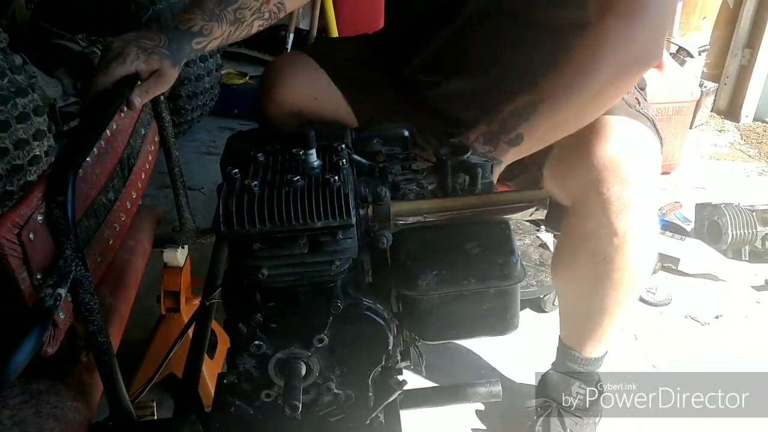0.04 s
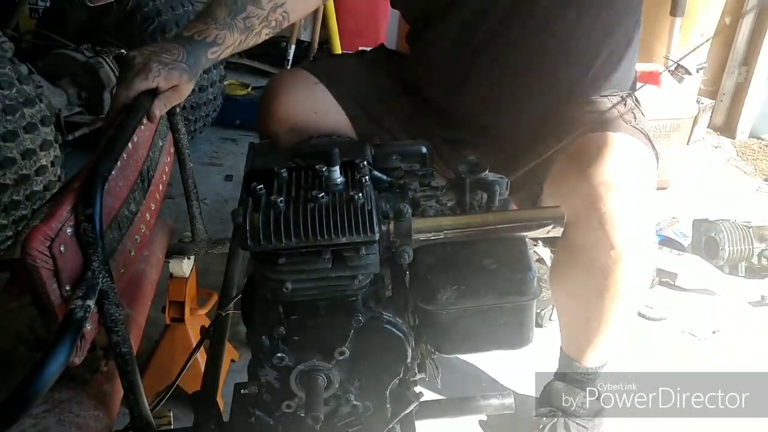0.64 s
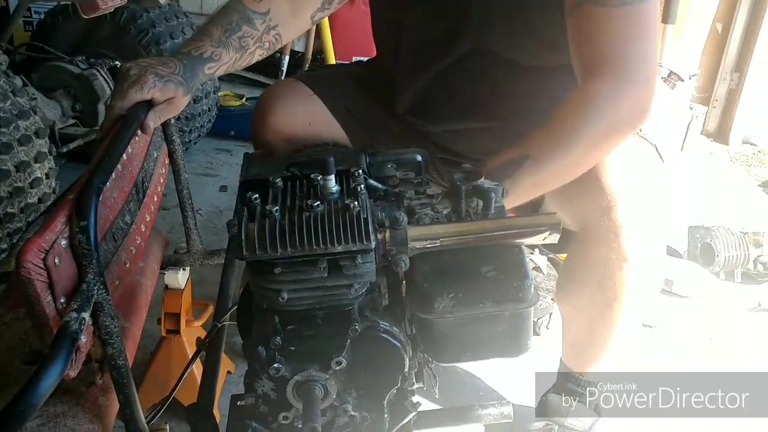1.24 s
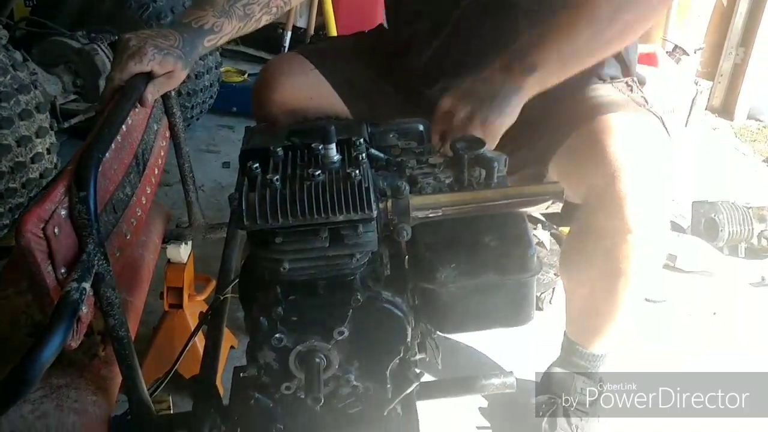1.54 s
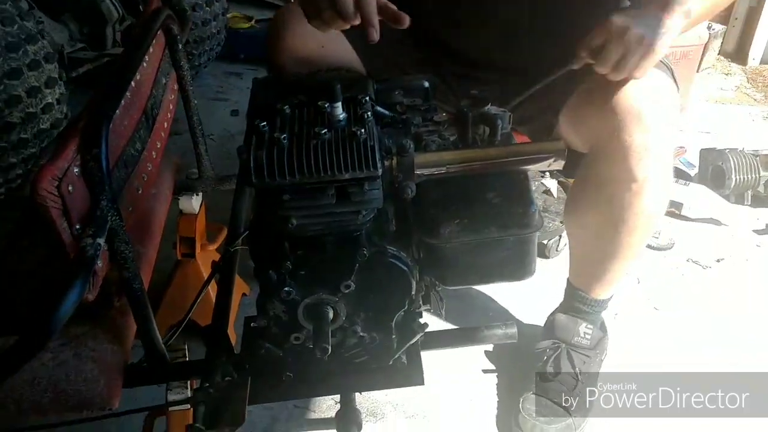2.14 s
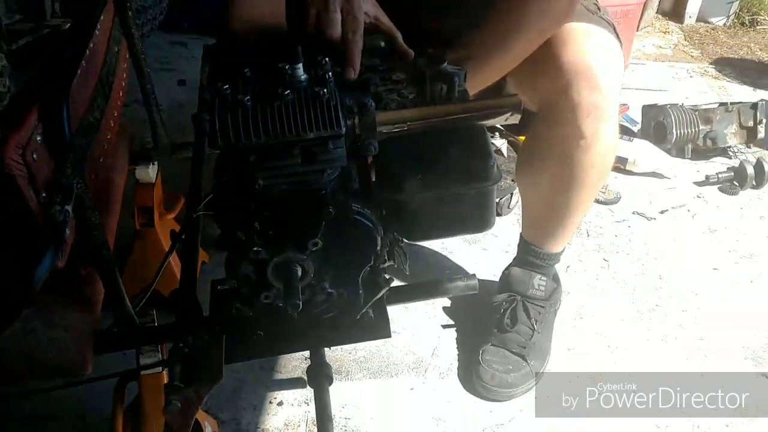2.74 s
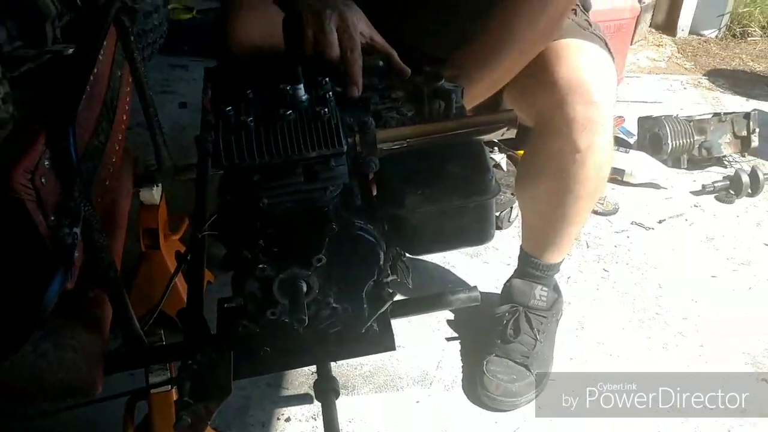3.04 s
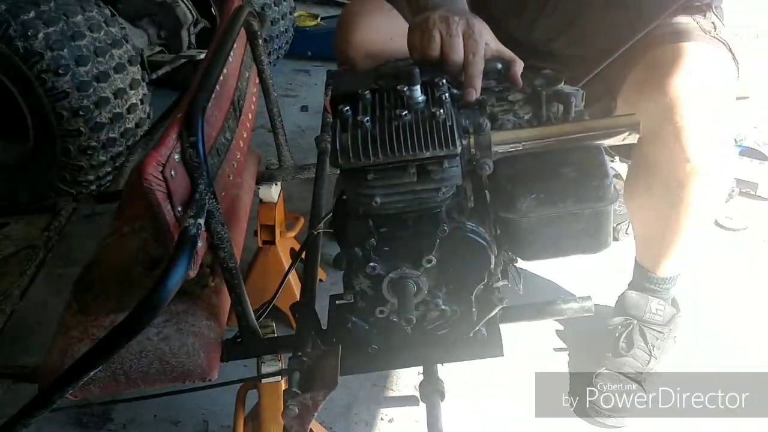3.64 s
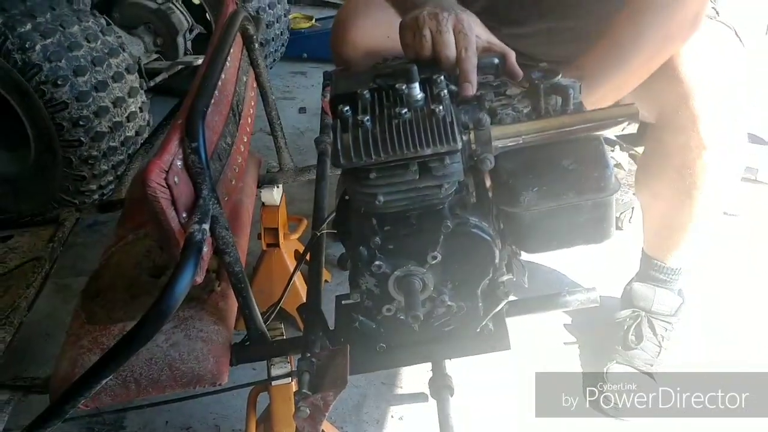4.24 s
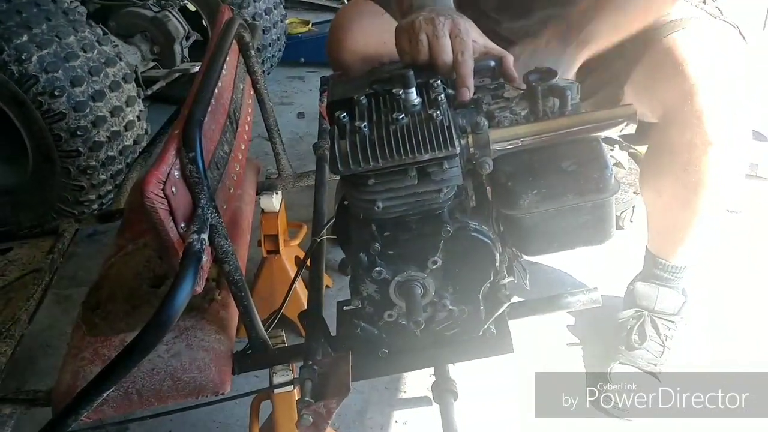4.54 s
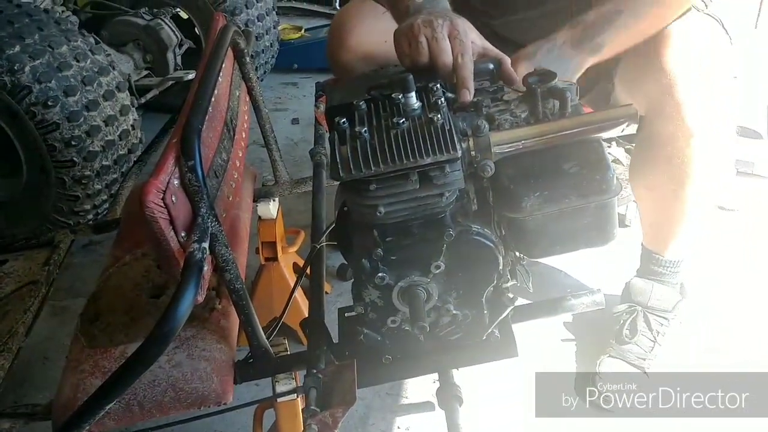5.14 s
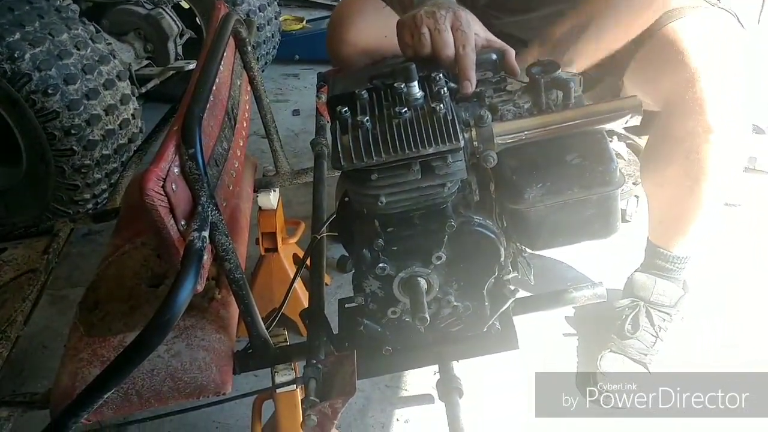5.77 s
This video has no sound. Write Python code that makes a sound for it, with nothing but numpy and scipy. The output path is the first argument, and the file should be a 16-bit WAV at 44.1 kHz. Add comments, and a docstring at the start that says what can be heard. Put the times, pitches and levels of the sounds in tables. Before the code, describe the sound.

A small petrol engine is pull-started four times without catching, with rope hiss, metal clacks, rattling and dull thumps.

```python
"""A rope hisses and loose metal knocks: someone is about to pull-start a small petrol engine in a workshop.
They pull four times, but it does not catch. On each pull the starter's catches (pawls) snap in, the
turning parts rattle, the piston thumps and air chuffs out; then the rope winds back and the handle
knocks home. Between pulls, fingers squeak and tap on the carburettor. Near the end, three tiny, high
pings fall in pitch over a soft background hiss and hum."""
import sys
import numpy as np
from scipy import signal
from scipy.fft import rfft, irfft, next_fast_len
from scipy.io import wavfile
from scipy.ndimage import uniform_filter1d

SR = 44100
rng = np.random.default_rng(int(sys.argv[2]) if len(sys.argv) > 2 else 0)


def unload_audio(sound):
    """Save the sound as a 16-bit wav file, at the path given as the first command line argument."""
    columns = np.transpose(np.atleast_2d(sound))
    # keep every value between -1 and 1, then stretch to whole-number steps
    steps = np.round(np.clip(columns, -1, 1) * 32767)
    wavfile.write(sys.argv[1], SR, steps.astype(np.int16))


N = 260526
TIME = np.arange(N) / SR
FFT_SIZE = next_fast_len(N + SR // 2)
HZ = np.maximum(np.arange(FFT_SIZE // 2 + 1) * SR / FFT_SIZE, 1)

# Levels are relative. A "colour" says how strong a sound is from low to high pitch.
# slides of the rope: loudest at t/s, level/dB, swell/(dB per s), fade/s, thinness/0-1
ROPE_SLIDES = [(0.085, -23, 74, 0.099, 0.12), (0.915, -36.5, 150, 0.015, 0.5),
               (1.677, -31.5, 322, 0.2, 0.6), (4.635, -22, 75.5, 0.12, 0.7)]
ROPE_COLOURS = [
    [(150, -13), (400, -5.5), (620, 0.5), (1200, -8), (2100, -22), (2800, -10.5), (4200, -13), (5400, -5),
     (6100, -15.5), (7400, 1), (8700, -14), (9600, -7.5), (12500, -12.5), (15300, -3)],
    [(150, -15.5), (400, -7), (700, 4.5), (1200, -12), (2100, -5.5), (3200, -0.5), (4200, -9), (5400, -3.5),
     (7400, 5), (8400, -22), (9500, 1), (12000, -2.5), (13400, 6.5), (15300, 1)],
]   # one full hiss and one thin hiss: f/Hz, level/dB
HISS_COLOUR = [(22, -25), (50, -12), (75, -3), (140, 5), (230, -6), (550, -7.5), (1100, -16), (1700, -20),
               (2150, -17.5), (2700, -20), (3300, -12.5), (4300, -10), (5300, -6), (9000, -18.5),
               (15300, -27.5)]   # background hiss: f/Hz, level/dB
ROOM_HUM = [(120, -88.5), (160, -56)]   # low tones of the room: f/Hz, level/dB
# knocks of the starter, handle and frame: t/s, level/dB, treble/dB, decay/s
METAL_KNOCKS = [(0.018, -29.5, -6, 0.0075), (0.041, -26.5, -16, 0.018), (0.082, -20.5, -2, 0.0045),
                (0.126, -26, -16, 0.0065), (0.4333, -29, 0.5, 0.0076), (0.496, -24.5, -0.5, 0.0081),
                (0.564, -19, -20, 0.033), (0.721, -19, -11.5, 0.024), (0.756, -18.5, -18, 0.0091),
                (0.872, -32.5, -10, 0.044), (0.905, -36.5, -13, 0.073), (1.091, -27, -15.5, 0.019),
                (1.179, -20, -28, 0.021), (1.423, -31, -21, 0.0095), (1.679, -25, -5, 0.023),
                (1.747, -23.5, -5, 0.017), (1.832, -31.5, -14, 0.0087), (1.889, -33, 1, 0.019),
                (1.915, -18.5, -13, 0.017), (1.957, -19, -9, 0.0068), (1.975, -25, -14, 0.027),
                (2.08, -41.5, -24, 0.0039), (2.102, -29, -25, 0.017), (2.122, -33.5, -18, 0.011),
                (2.158, -33, -13, 0.019), (2.21, -35, -16, 0.03), (2.482, -33, -18, 0.0041),
                (3.306, -44, -31, 0.028), (3.389, -43, -9.5, 0.055), (3.472, -35.5, -23, 0.036),
                (3.494, -24, -19, 0.014), (3.568, -22.5, -9, 0.015), (3.603, -24, -21, 0.008),
                (3.622, -23.5, -14.5, 0.005), (3.656, -17.5, -24.5, 0.013), (3.728, -25, -13, 0.016),
                (3.824, -31, -13.5, 0.011), (3.971, -36, -9, 0.0091), (3.997, -31, -13.5, 0.018),
                (4.038, -36, -29, 0.064), (4.195, -28.5, -13.5, 0.026), (4.3047, -22.5, -36.5, 0.013),
                (4.373, -35.5, -25.5, 0.016), (4.4614, -21.5, -14, 0.0049), (4.501, -24.5, -18.5, 0.0063),
                (4.581, -28.5, -20.5, 0.0057), (4.673, -11.5, -14.5, 0.012), (4.775, -21.5, -5, 0.015),
                (4.807, -27.5, -16, 0.0099), (4.881, -21.5, -2, 0.015), (5.279, -38, -35, 0.014),
                (5.319, -40, -25, 0.011), (5.869, -49, -16.5, 0.12)]
METAL_TICKS = [(0.436, -13.5), (0.5425, -27), (1.009, -26), (1.14, -26), (1.771, -10.5), (2.015, -26),
               (2.223, -33), (2.282, -25), (2.367, -24.5), (2.4384, -25.5), (2.506, -27), (3.603, -13.5),
               (3.955, -23), (4.02, -23), (4.153, -25), (5.4256, -42.5), (5.466, -45)]   # light ticks: t/s, level/dB
KNOCK_COLOUR = [(100, -18.5), (250, -10.5), (400, -3), (650, -1), (900, 0.5), (1250, -6), (1550, -8),
                (1800, -6.5), (2200, -9), (3100, -12), (4400, -27.5), (8000, -35.5)]   # body of a knock: f/Hz, level/dB
SCRAPE_COLOUR = [(1800, -23), (2700, -6.5), (3500, 4), (4300, 0.5), (5200, 1), (7000, 1.5), (10000, -1),
                 (12000, -4.5), (13000, 0), (14000, -9.5), (15300, -0.5)]   # bright metal contact: f/Hz, level/dB
CASING_RINGS = [(299, 18, 3), (381.2, 6.6, 8.5), (470, 110, 5), (591.4, 18, 10), (709, 7.7, 5.5),
                (849, 64, 6.5), (1022, 33, 6.5), (1100, 28, 9), (1239, 100, 7.5), (1550, 45, 1.5),
                (1708, 54, 7), (2970, 49, 0), (3090, 24, -0.5), (3550, 70, -0.5), (3650, 22, 0.5),
                (4780, 410, 5.5), (5100, 34, 6), (6330, 60, 3), (11100, 45, 3)]   # pitches at which the casing rings: f/Hz, width/Hz, lift/dB
STEEL_RINGS = [(580, -8.5, .7), (843, -9, .8), (1095, -16, .5), (1286, -16, 0.44), (1580, -14.5, .4)]   # thin steel parts: f/Hz, level/dB, time to fall 60 dB/s
# squeaks of pulley, spring and fingertips: t/s, length/s, start f/Hz, end f/Hz, level/dB, waver/share of f
SQUEAK_GLIDES = [(0.343, 0.015, 4330, 4120, -37, .035), (0.391, 0.012, 4530, 4270, -36, .035),
                 (0.612, 0.03, 3230, 2600, -24.5, 0.043), (0.635, 0.069, 5100, 5080, -29.5, 0.062),
                 (1.396, .012, 4480, 4130, -41, .03), (1.441, 0.013, 4560, 4030, -32, 0.027),
                 (1.492, 0.049, 4290, 4590, -34, 0.03), (2.1, 0.055, 2930, 3000, -38.5, 0.024),
                 (2.328, 0.04, 180, 219, -44, .03), (2.55, 0.29, 852, 843, -51, .007),
                 (2.818, 0.04, 540, 310, -41.5, 0.12), (2.854, 0.033, 276, 187, -41, .1),
                 (2.883, 0.031, 850, 830, -40, .02), (2.898, 0.032, 677, 516, -44.5, .1),
                 (2.911, 0.032, 450, 249, -40.5, .12), (2.994, 0.016, 347, 288, -37.5, .03),
                 (3.02, 0.016, 293, 240, -38, .03), (3.023, 0.026, 748, 500, -45, .03)]
# pawls hitting the starter cup: t/s, level/dB, decay/s, clang/dB, sharpness/0-1
PAWL_SNAPS = [(0.4358, -18, 0.009, -16, 0.6), (0.4432, -18.5, 0.016, -9, 0.3),
              (0.456, -22.5, .012, -9.5, 0.4), (0.49, -22, .012, -10, .4), (0.513, -24, 0.011, -5.5, .5),
              (0.733, -19.5, 0.018, -22, 0), (1.677, -18.5, 0.021, -4.5, 0.02),
              (1.696, -21, 0.0065, -8.5, .5), (1.768, -17, 0.0035, -14, 0.1), (3.569, -22.5, 0.036, -6, 0),
              (3.676, -18.5, 0.009, -1.5, 0.6), (4.882, -11, 0.009, -2.5, 1)]
SOLID_COLOUR = [(420, -15.5), (560, -2.5), (700, -12), (900, 4.5), (1250, -4), (1650, -5), (2200, -7)]   # solid clack: f/Hz, level/dB
SHARP_COLOUR = [(600, -10.5), (900, -4), (1300, -2), (1650, -1.5), (2200, -10.5)]   # sharper clack: f/Hz, level/dB
CLANG_COLOUR = [(2200, -22.5), (2800, -2.5), (3400, -1), (4300, -17.5), (6000, -17.5)]   # high clang: f/Hz, level/dB
# pulls: t/s, pull/s, rewind/s, rattle level/dB, scrape level/dB, rattle drop/dB, scrape drop/dB
ROPE_PULLS = [(0.46, 0.21, 0.7, -27.5, -28, 2, 6.5), (1.672, 0.3, 1, -27.5, -30.5, 7.5, 9.5),
              (3.538, 0.29, 0.96, -30, -31.5, 7, 9), (4.694, 0.17, 0.29, -24.5, -27.5, 6, 5)]
# the crank falters as the piston climbs: t/s, dip/dB (a negative dip is a lift)
CRANK_STALLS = [(0.487, 2.5), (0.71, -2), (3.643, 6.5)]
RATTLE_COLOUR = [(50, -31), (110, -7), (240, -3), (380, -2.5), (520, -9), (720, -7), (950, -1.5),
                 (1250, -5.5), (1500, -7.5), (1800, -7), (2200, -9), (3000, -10), (3600, -20.5),
                 (4400, -23.5)]   # dull rattle of the turning parts: f/Hz, level/dB
PISTON_STROKES = [(0.502, -26.5), (0.586, -9.5), (1.777, -14), (1.916, -12), (3.604, -24.5), (3.697, -16.5),
                  (4.777, -12.5), (4.899, -21), (4.957, -23.5), (5.025, -24), (5.132, -26)]   # the piston pushes against trapped air: t/s, level/dB
FRAME_RINGS = [(62, -9.5, 0.026), (120, 4, 0.036), (148.3, -12.5, 0.19)]   # the engine on its frame: f/Hz, level/dB, time to fall 60 dB/s
# air leaving the cylinder: t/s, pop level/dB, rush level/dB, decay/s, lower f/Hz, upper f/Hz
AIR_BURSTS = [(0.586, 12, -13, 0.0027, 360, 804), (0.5919, 17.5, -10.5, 0.0023, 393, 820),
              (1.7712, 11, -7, 0.0038, 390, 830), (3.694, 18, -10, 0.0088, 396, 820),
              (3.7007, 13, -13.5, .005, 420, 850), (4.8946, 18.5, -9.5, 0.004, 318, 470)]
PORT_RINGS = [(55, 12.5), (100, 8)]   # lower and upper ring of the air outlet: width/Hz, lift/dB
CHUFF_COLOUR = [(110, -3.5), (220, -12), (370, -6), (600, -9), (850, -4.5), (1150, -4.5), (1600, -12),
                (2200, -10), (3300, -13.5), (4500, -21), (9000, -24.5), (15000, -25.5)]   # escaping air: f/Hz, level/dB
HAND_CHANGES = [(304, 37, 1.5), (430, 52, 3), (595, 30, -2.5), (617, 40, 2.5), (850, 56, -0.5),
                (925, 40, -5.5), (1097, 49, -4.5), (1380, 100, 0.5), (1543, 63, -0.5), (1700, 110, -3.5)]   # how a resting hand changes the ringing: f/Hz, width/Hz, change/dB
SCUFF_COLOUR = [(3000, 0), (4300, -8), (5500, 2), (7200, -4), (8300, -6), (9600, 1.5), (11000, -15),
                (13300, -6), (15300, -11)]   # a hand brushing the starter housing: f/Hz, level/dB
FINGER_COLOUR = [(150, 1.5), (380, -11.5), (600, -5.5), (900, -0.5), (1300, -5), (2000, -8), (3300, -2.5),
                 (4400, -19)]   # fingers on metal: f/Hz, level/dB
FINGER_TAPS = [(2.861, -45), (2.9948, -43), (3.025, -40.5)]   # taps on the carburettor: t/s, level/dB
HIGH_PINGS = [(5.634, 12500, -40), (5.640, 9600, -36), (5.649, 6970, -40.5)]   # tiny pings near the end: t/s, f/Hz, level/dB
EAR_LIKENESS = [(60, 0.4), (130, 0), (250, 0.7), (500, 0.83), (1100, 1), (1700, 0.66), (2150, 0.95),
                (2700, 0.22), (3300, 0.75), (4300, 0.62), (5400, 0.32), (8000, 0.2), (14000, 0)]   # how alike left and right are: f/Hz, likeness/0-1
LEFT_LOUDER = [(60, 1), (150, 1.5), (400, 2.5), (800, 2), (1200, -1.5), (3000, 0), (8000, 0), (14000, -2.5)]   # how much louder the left side is: f/Hz, level/dB
LEFT_AHEAD = [(0, 0), (300, -.4), (800, -.25), (1300, .1), (2150, 3.1), (3250, 6.2), (4300, 8.8),
              (6500, 14.8), (9900, 23.3), (13200, 32.1), (16000, 40.8)]   # how far the left side is ahead: f/Hz, phase/rad


def from_db(db):
    """Turn decibels into a number to multiply by."""
    return np.exp(np.asarray(db) * (np.log(10) / 20))


def rms_one(x):
    """Scale to an average power of 1."""
    return x / np.sqrt(np.mean(x ** 2) + 1e-20)


def at_hz(points):
    """Join a table's points into a curve over all frequencies."""
    hz, value = np.transpose(points)
    return np.interp(np.log(HZ), np.log(hz), value)


def peaks(rows):
    """A curve in dB with a bump or dip at each ringing pitch."""
    return sum(lift / (1 + (2 * (HZ - hz) / width) ** 2) for hz, width, lift in rows)


def filtered(x, response):
    """Pass a sound through a filter, given frequency by frequency."""
    return irfft(rfft(x.astype(np.float32), FFT_SIZE) * response.astype(np.complex64), FFT_SIZE)[..., :N]


def causal(gain):
    """A filter with these gains that rings after a hit, never before it."""
    cepstrum = irfft(np.log(gain).astype(np.float32), FFT_SIZE)
    cepstrum[1:FFT_SIZE // 2] *= 2
    cepstrum[FFT_SIZE // 2 + 1:] = 0
    return np.exp(rfft(cepstrum))


def colour(points, ring=0):
    """Make a filter from a colour table; `ring` sets how strongly the CASING_RINGS peaks are added."""
    octaves_below = np.maximum(np.log2(points[0][0] / HZ), 0)
    octaves_above = np.maximum(np.log2(HZ / points[-1][0]), 0)
    db = at_hz(points) + ring * peaks(CASING_RINGS) - 15 * (octaves_below + octaves_above)
    return causal(rms_one(from_db(db)))


def noise():
    """White stereo noise, most alike in both ears at middle pitches."""
    alike = np.clip(at_hz(EAR_LIKENESS), -.99, .99)
    mid, side = filtered(rng.standard_normal((2, N)), np.sqrt([1 + alike, 1 - alike]) / np.sqrt(2))
    return np.array([mid + side, mid - side])


def ramp(start_s, length_s):
    """Rise from 0 to 1 along a straight line."""
    return np.clip((TIME - start_s) / length_s, 0, 1)


def burst(s, db, decay_s, rise_s=0.00066):
    """Loudness of one contact: it rises quickly and dies away."""
    out, start = np.zeros(N), int(s * SR)
    age = TIME[:min(N - start, SR // 2)]
    out[start:start + len(age)] = from_db(db) * (1 - np.exp(-age / rise_s)) * np.exp(-age / decay_s)
    return out


def chatter(per_s, smooth_share, decay_s, spread_db=3):
    """Loudness of many small, uneven contacts on top of a steady rub."""
    sizes = from_db(spread_db * np.minimum(rng.exponential(1, N), 3))
    hits = sizes * (rng.random(N) < per_s / SR)
    power = signal.lfilter([1], [1, -np.exp(-2 / (decay_s * SR))], hits ** 2 + 1e-12)
    power /= uniform_filter1d(power, size=2200) + power.mean() / 20   # even out slow changes
    return rms_one(np.sqrt(smooth_share + (1 - smooth_share) * power))


def slide(peak_s, db, swell_db_per_s, fade_s):
    """Loudness of one sliding move: a steady swell, then a rounded fade."""
    swell = from_db(db - swell_db_per_s * np.maximum(peak_s - TIME, 0))
    return swell * np.exp(-(np.maximum(TIME - peak_s, 0) / fade_s) ** 2)


def rope():
    """The rope rubs through its guide with a grainy hiss, full or thin."""
    grain = noise() * chatter(per_s=1200, smooth_share=.6, decay_s=.003)
    full = sum(slide(*move) * (1 - thinness) for *move, thinness in ROPE_SLIDES)
    thin = sum(slide(*move) * thinness for *move, thinness in ROPE_SLIDES)
    return sum(filtered(grain * gain, colour(shape)) for gain, shape in zip((full, thin), ROPE_COLOURS))


def background(hiss_db=-47, sink_db=14):
    """Soft background hiss with a few gentle peaks, and a low hum; both sink after the last pull."""
    hum = sum(from_db(db) * np.sin(2 * np.pi * hz * TIME) for hz, db in ROOM_HUM)
    swell_db = 1.5 * np.exp(-((TIME - 3.3) / 0.27) ** 2)   # a little louder in the long pause
    hiss = from_db(hiss_db + swell_db) * filtered(noise(), colour(HISS_COLOUR, ring=.5))
    return (hiss + hum) * from_db(-sink_db * ramp(start_s=5.2, length_s=0.096))


def knocks(impact_db=8, crack_db=5.5, tick_db=-9.5, bounce_s=0.01, bounce_db=-9):
    """Loose metal hits the casing, buzzes and bounces once; light ticks only stir its high notes."""
    impacts, body, crack = np.zeros((3, N))
    for s, db, treble_db, decay_s in METAL_KNOCKS:
        impacts[int(s * SR)] = from_db(db + impact_db)
        for hit_s, hit_db in [(s, db), (s + bounce_s, db + bounce_db)]:
            body += burst(hit_s, hit_db, decay_s)
            crack += burst(hit_s, hit_db + treble_db + crack_db, decay_s)
    ticks = sum(burst(s, db + tick_db, decay_s=0.011) for s, db in METAL_TICKS)
    dull = filtered(impacts + noise() * body, colour(KNOCK_COLOUR, ring=1))
    bright = filtered(noise() * (crack + ticks), colour(SCRAPE_COLOUR, ring=1))
    return dull + bright


def singing_steel(x):
    """Thin steel parts pick up the blows and ring on after them."""
    response = sum(from_db(db) / (1 + 2j * np.pi * (HZ - hz) * ring_s / np.log(1000))
                   for hz, db, ring_s in STEEL_RINGS)
    return x + filtered(x, response)


def workshop(x, echo_db=-9.5, ring_s=0.28, echo_high_cut_hz=9000, echo_low_cut_hz=350):
    """The short room echo has little bass, and clutter soaks up its highest treble."""
    tail = noise() * from_db(-60 * TIME / ring_s) * (1 - np.exp(-(TIME / 0.0059) ** 2))
    tail /= np.sqrt(np.sum(tail ** 2) / 2)
    kept = 1 / (1 + 1j * HZ / echo_high_cut_hz) / (1 + echo_low_cut_hz / (1j * HZ)) ** 2
    return x + from_db(echo_db) * filtered(x, rfft(tail, FFT_SIZE) * kept)


def treble_ripple(x, copy_db=-8.5, lowest_hz=2200, delay_s=.004, sway_s=.0004, sway_hz=.9):
    """A faint, slowly shifting ripple in the treble's colour, made by adding three delayed copies."""
    treble = filtered(x, 1 / (1 + (lowest_hz / HZ) ** 4))
    copies, draws = 0, rng.random((3, 2))
    for lateness, turn in draws:
        delay = delay_s * (lateness + .5) / 1.5 + sway_s * np.sin(2 * np.pi * (sway_hz * TIME + turn))
        copies = copies + np.array([np.interp(TIME - delay, TIME, side) for side in treble])
    gain = from_db(copy_db)
    return x - treble + (treble + gain * copies) / np.sqrt(1 + len(draws) * gain ** 2)


def squeaks(octave_db=-20):
    """Surfaces stick and slip, making short, wavering tones that glide in pitch."""
    out = np.zeros(N)
    for s, length_s, start_hz, end_hz, db, waver in SQUEAK_GLIDES:
        start, along = int(s * SR), np.linspace(0, 1, int(length_s * SR))
        unsteady = 1 + waver * np.interp(along, np.linspace(0, 1, 20), rng.standard_normal(20))
        phase = 2 * np.pi * np.cumsum((start_hz + (end_hz - start_hz) * along) * unsteady) / SR
        tone = np.sin(phase) + from_db(octave_db) * np.sin(2 * phase)
        out[start:start + len(along)] += from_db(db) * np.sin(np.pi * along) * tone
    return out


def pawls(impact_db=17, cup_ring_db=-42.5, cup_ring_s=0.071):
    """Small steel catches snap against the starter cup, which clacks, clangs and rings on."""
    buzz, age = noise(), TIME[:SR // 3]
    solid, sharp, clangs = np.zeros((3, 2, N))
    for s, db, decay_s, clang_db, sharpness in PAWL_SNAPS:
        span = slice(int(s * SR), int(s * SR) + len(age))
        impact = from_db(db + impact_db) * (age == 0)
        snap = impact + buzz[:, span] * burst(s, db, decay_s)[span]
        clack = snap + buzz[:, span] * burst(s, db + cup_ring_db, cup_ring_s)[span]
        solid[:, span] += (1 - sharpness) * clack
        sharp[:, span] += sharpness * clack
        clangs[:, span] += from_db(clang_db) * snap
    parts = [(solid, SOLID_COLOUR), (sharp, SHARP_COLOUR), (clangs, CLANG_COLOUR)]
    return sum(filtered(force, colour(shape, ring=1)) for force, shape in parts)


def turning(bright=False, spin_up_s=0.093, let_go_s=0.014, stall_s=0.016):
    """Loudness of the dull rattle or bright scrape as the starter turns on each pull."""
    out = np.zeros(N)
    for start, pull_s, rewind_s, rattle_db, scrape_db, rattle_drop_db, scrape_drop_db in ROPE_PULLS:
        pull_db, drop_db = (scrape_db, scrape_drop_db) if bright else (rattle_db, rattle_drop_db)
        let_go = start + pull_s
        coast_s = np.maximum(TIME - let_go, 0)
        db = pull_db - 5 * (1 - ramp(start, spin_up_s))   # the crank gathers speed
        db -= drop_db * ramp(let_go, let_go_s)   # the pull eases off
        db -= 26.5 * coast_s   # the starter slows as it rewinds
        db -= 55.5 * np.maximum(coast_s - rewind_s, 0)   # then it comes to rest
        out += from_db(db) * (TIME >= start)
    stall_db = sum(db * np.exp(-((TIME - s) / stall_s) ** 2) for s, db in CRANK_STALLS)
    return out * from_db(-stall_db)


def starter():
    """Turning parts rattle the casing; the same contacts scrape brightly."""
    contacts = noise() * chatter(per_s=400, smooth_share=.35, decay_s=.004)
    rattle = filtered(contacts * turning(), colour(RATTLE_COLOUR, ring=1.03))
    scrape = filtered(contacts * turning(bright=True), colour(SCRAPE_COLOUR, ring=1))
    return rattle + scrape


def clinks(clink_db=9.5, loss_db_per_octave=7, spread_db=12.5, lowest_hz=600, decay_s=.011):
    """Loose parts ring briefly, each at its own pitch, louder when the starter rattles harder."""
    rattle, age = turning(), TIME[:SR // 16]
    out = np.zeros(N)
    for when, height, size in rng.random((700, 3)):
        start, octaves = int(when * (N - len(age))), 3.5 * height
        hz = lowest_hz * 2 ** octaves
        gain = rattle[start] * from_db(clink_db - loss_db_per_octave * octaves + spread_db * (size - 1))
        out[start:start + len(age)] += gain * np.sin(2 * np.pi * hz * age) * np.exp(-age / decay_s)
    return out


def piston_thumps(rise_s=0.0055, lowest_hz=55, left_db=3):
    """Each push of the piston against trapped air rocks the engine on its frame."""
    strokes, age = np.zeros(N), TIME[:SR // 2]
    for s, db in PISTON_STROKES:
        strokes[int(s * SR)] = from_db(db)
    ring = sum(from_db(db - 60 * age / ring_s) * np.sin(2 * np.pi * hz * age)
               for hz, db, ring_s in FRAME_RINGS)
    thumps = filtered(strokes, rfft(ring * (1 - np.exp(-age / rise_s)), FFT_SIZE))
    # so small a body gives off little deep bass
    bass_cut = signal.butter(4, lowest_hz, "high", fs=SR, output="sos")
    return signal.sosfilt(bass_cut, thumps) * from_db([[left_db], [-left_db]])


def chuffs(pop_s=0.000084, port_db=-3):
    """Trapped air leaves with a pop and a short rush, ringing at two pitches that move with the piston."""
    air, out = noise(), np.zeros((2, N))
    for s, pop_db, rush_db, decay_s, *pitches in AIR_BURSTS:
        span = slice(int(s * SR), int(s * SR) + SR // 8)
        flow = burst(s, pop_db, pop_s)[span] + air[:, span] * burst(s, rush_db, decay_s)[span]
        for hz, (width, lift_db) in zip(pitches, PORT_RINGS):
            ring = signal.lfilter(*signal.iirpeak(hz, hz / width, fs=SR), flow)
            flow = flow + (from_db(lift_db) - 1) * ring
        out[:, span] += from_db(port_db) * flow
    return filtered(out, colour(CHUFF_COLOUR))


def resting_hand(x):
    """Once a hand rests on the engine, some ringing notes are muffled and others stand out."""
    grip = ramp(start_s=2.14, length_s=0.25)
    return x * (1 - grip) + filtered(x * grip, causal(from_db(peaks(HAND_CHANGES))))


def fingers(rub_db=-46.5, tap_db=14.5, clang_db=-1):
    """A hand scuffs the starter housing, then fingers rub and tap the carburettor."""
    scuff = slide(peak_s=2.52, db=-38.5, swell_db_per_s=400, fade_s=0.088)
    rub = from_db(rub_db) * (ramp(start_s=2.55, length_s=0.46) - ramp(start_s=3.29, length_s=0.18))
    taps = sum(burst(s, db + tap_db, decay_s=.003) for s, db in FINGER_TAPS)
    skin = noise()
    return (filtered(skin * scuff, colour(SCUFF_COLOUR))
            + filtered(skin * (taps + rub), colour(FINGER_COLOUR, ring=.5))
            + from_db(clang_db) * filtered(skin * taps, colour(CLANG_COLOUR)))


def pings():
    """Three tiny, high pings near the end, each lower than the one before."""
    return sum(burst(s, db, decay_s=.0009, rise_s=0.00016) * np.sin(2 * np.pi * hz * TIME)
               for s, hz, db in HIGH_PINGS)


def scene():
    """The engine and the hands on it, in the room."""
    metal = singing_steel(starter() + clinks() + pawls() + knocks())
    engine = resting_hand(metal + chuffs()) + piston_thumps()
    in_room = workshop(engine + rope() + fingers() + squeaks())
    return treble_ripple(in_room) + pings() + background()


def record(dry, ceiling=1.3, cutoff_hz=15500):
    """Two unequal microphones a little apart; loud peaks are rounded and the highest treble is cut."""
    tilt_db = at_hz(LEFT_LOUDER) / 2
    lead = np.exp(.5j * np.interp(HZ, *np.transpose(LEFT_AHEAD)))
    sides = filtered(dry, np.array([from_db(tilt_db) * lead, from_db(-tilt_db) / lead]))
    rounded = ceiling * np.tanh(sides / ceiling)
    return signal.sosfilt(signal.ellip(12, .1, 80, cutoff_hz, fs=SR, output="sos"), rounded)


dry = scene()
out = record(dry)
unload_audio(out)
```